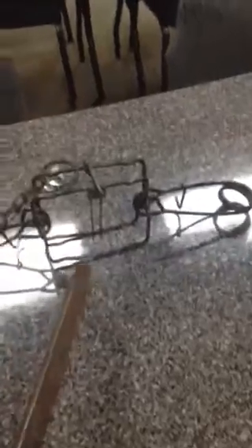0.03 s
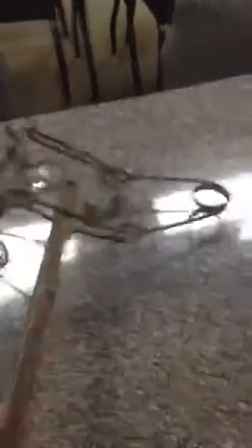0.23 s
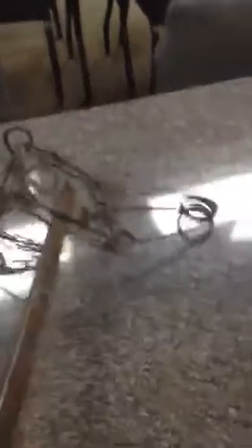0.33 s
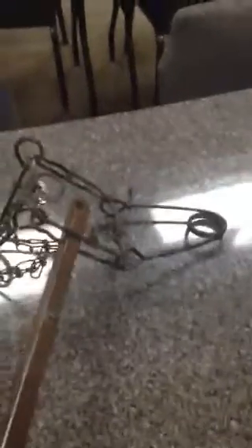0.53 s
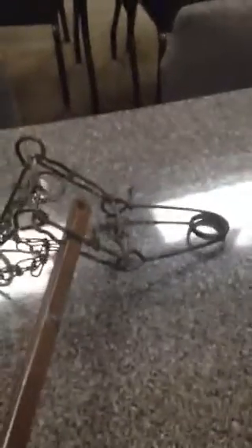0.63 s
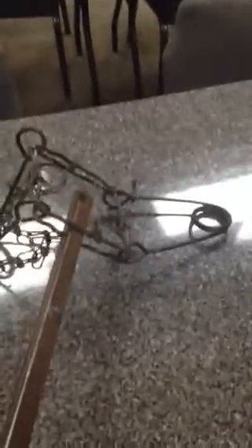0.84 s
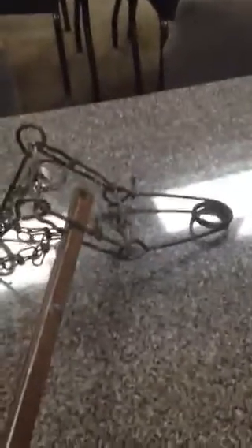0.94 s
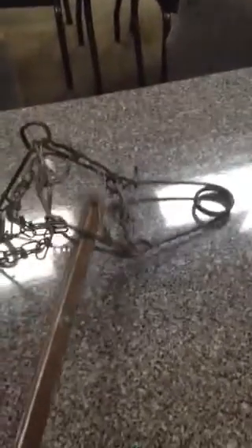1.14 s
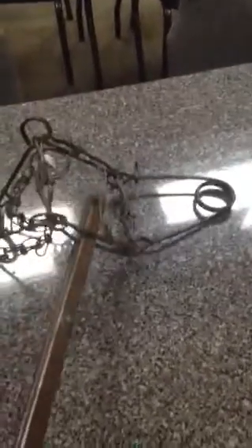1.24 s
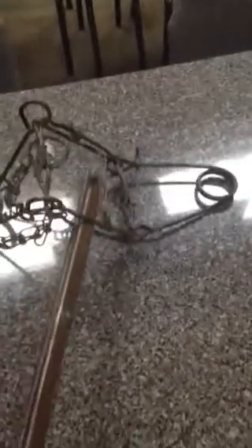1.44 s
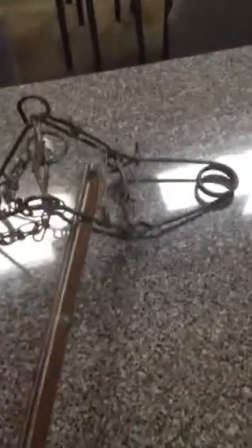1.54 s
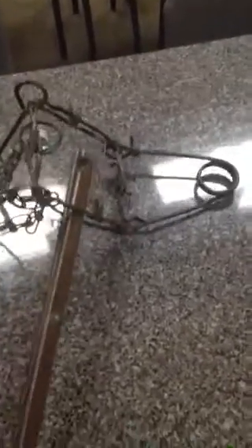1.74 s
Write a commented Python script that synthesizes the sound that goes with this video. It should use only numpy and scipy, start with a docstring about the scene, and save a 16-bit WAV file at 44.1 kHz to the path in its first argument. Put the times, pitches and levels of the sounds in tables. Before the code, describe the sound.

A wire trap slams shut sharply, followed by metal clacks, chain ticks and wooden knocks.

```python
"""A wooden stick trips a wire spring trap on a stone counter, in an echoing room with a low hush.
The trap slides softly, the trigger slips, and the jaws slam shut, chatter and leave the steel ringing.
The trap jumps, lands and settles with knocks and clacks, while links of its chain tick.
Later it slides again, the chain clicks against the frame and the stick knocks down twice.
A few faint ticks of the chain come last."""
import sys
import numpy as np
from scipy import signal
from scipy.fft import rfft, irfft
from scipy.io import wavfile

SR = 44100
rng = np.random.default_rng(int(sys.argv[2]) if len(sys.argv) > 2 else 0)


def wav_out(sig):
    """Save sig, one row per channel (or a flat mono array), as 16-bit PCM at SR to the path in sys.argv[1]."""
    wavfile.write(sys.argv[1], SR, np.round(np.clip(np.atleast_2d(sig).T, -1, 1) * 32767).astype(np.int16))


N = 79380  # 1.8 seconds

# In all tables, fade_s is the time to die away by 60 dB; a higher tilt makes a brighter sound.
# Chain links hit: start_s, level_db, tilt_db_per_octave, fade_s, ping_hz, ping_db, ping_fade_s
LINK_HITS = [(0.449, -31, -5, 0.015, 11530, -42, 0.063), (0.525, -30, 4, 0.024, 13650, -35, 0.026),
             (0.5585, -56, 9, 0.0086, 9700, -55.5, 0.27), (1.1642, -16.5, 3.5, 0.015, 8800, -29.5, 0.08),
             (1.1737, -35.5, -6.5, 0.037, 14400, -52, .03), (1.2115, -50.5, 24, .06, 9500, -59, .04),
             (1.221, -55, 14, .04, 11150, -50, 0.055), (1.2460, -63, 14, .015, 9540, -45, 0.015),
             (1.3840, -66.5, 9, 0.013, 9230, -57, 0.036), (1.426, -63, 8, .03, 10200, -66, .03),
             (1.4440, -79, 2, .02, 9700, -69, .03), (1.7660, -65, 2.5, .03, 11800, -71.5, .03)]


def from_db(db):
    """Turn decibels into a number to multiply by."""
    return 10 ** (np.asarray(db) / 20)


def at_hz(points, hz):
    """Read between the rows of a table, spacing the pitches by octaves."""
    pitches, values = np.transpose(points)
    return np.interp(np.log(np.maximum(hz, 1)), np.log(pitches), values)


def add(out, start_s, sound):
    """Mix a sound in at its start time."""
    i = int(start_s * SR)
    out[i:i + len(sound)] += sound[:len(out) - i]


def fade(fade_s, size):
    """A curve that falls by 60 dB every fade_s seconds."""
    return np.exp(-np.log(1000) * np.arange(size) / SR / max(fade_s, .002))


def gains(colour, size, tilt_db=0):
    """Turn a colour (the balance of low and high pitches) into gains that keep noise equally strong."""
    hz = np.fft.rfftfreq(size, 1 / SR)
    gain = from_db(at_hz(colour, hz) + tilt_db * np.log2(np.maximum(hz, 300)))
    return gain / np.sqrt(np.mean(gain ** 2))


def causal(gain):
    """Make a filter from these gains that lets nothing sound before the blow (minimum phase)."""
    cepstrum = irfft(np.log(gain))
    half = len(cepstrum) // 2
    cepstrum[1:half] *= 2
    cepstrum[half + 1:] = 0
    return np.exp(rfft(cepstrum))


def noise(colour, size, tilt_db=0):
    """Steady noise of a given colour, with an average strength (rms) of 1."""
    gain = gains(colour, size, tilt_db)
    return irfft(gain * np.exp(2j * np.pi * rng.random(len(gain))), size) * np.sqrt(size)


def contacts(rows, colour, size=8192, thump=0):
    """Each hit is a short burst of shaking, coloured by the thing that shakes."""
    out = np.zeros(N)
    for start_s, level_db, tilt_db, fade_s, *_ in rows:
        burst = rng.standard_normal(size) * fade(fade_s, size)
        burst[0] += thump * np.linalg.norm(burst)  # a first push, relative to the burst
        body = causal(gains(colour, size, tilt_db))
        add(out, start_s, from_db(level_db) * irfft(rfft(burst) * body))
    return out


def ringing(blows, tones):
    """Every blow rings all of an object's own tones, each with a slightly random strength."""
    out, t = np.zeros(N), np.arange(N // 2) / SR
    for pitch_hz, tone_db, fade_s in tones:
        tone = np.sin(2 * np.pi * pitch_hz * t) * fade(fade_s, len(t))
        for start_s, blow_db, *_ in blows:
            add(out, start_s, from_db(blow_db + tone_db + rng.normal()) * tone)
    return out


def hush():
    """The room's low, steady background noise."""
    # Colour of the hush: pitch_hz, level_db
    colour = [(40, -38.5), (100, -13), (170, 4.5), (290, 4), (440, -7), (680, -2.5), (1100, -11),
              (2600, -17.5), (4300, -30), (8000, -37.5), (15500, -39)]
    return from_db(-56.5) * noise(colour, N)


def slides():
    """The trap rubs on the counter in soft swells of noise."""
    # Small slides: start_s, length_s, level_db, tilt_db_per_octave
    moves = [(0.13, 0.19, -58, 5.5), (0.85, 0.1103, -54, -1), (0.858, 0.039, -52, 3.5),
             (1.1, 0.088, -48, -0.5), (1.148, 0.0209, -47.5, 5)]
    # Colour of the rubbing: pitch_hz, level_db
    colour = [(150, -27), (280, 12.5), (350, -13.5), (520, -4), (700, -19.5), (3300, -28), (5000, -44),
              (9000, -53), (15000, -68.5)]
    out = np.zeros(N)
    for start_s, length_s, level_db, tilt_db in moves:
        swell = np.hanning(int(length_s * SR))
        rubbing = noise(colour, size=16384, tilt_db=tilt_db)[:len(swell)]
        add(out, start_s, from_db(level_db) * swell * rubbing)
    return out


def trap():
    """The jaws slam, chatter and leave the steel ringing; the wire frame clacks as it settles."""
    # Trigger and jaws strike: start_s, level_db, tilt_db_per_octave, fade_s
    snaps = [(0.2112, -20.5, 1, .025), (0.2128, -14, 5, .025), (0.2213, -21, 3, .03),
             (0.2252, -14, -4.5, .025), (0.2295, 1.5, 3, .06), (0.2385, -6, -1.5, 0.13),
             (0.2465, -6, 0, .07), (0.2565, -10.5, -3.5, .04), (0.2725, -15, 2.5, 0.023)]
    # Colour of a snap: pitch_hz, level_db
    snap_colour = [(40, -7.5), (150, -5.5), (400, -8), (1400, -1), (2600, -2.5), (5000, -3.5), (7500, -1.5),
                   (10300, 3.5), (12500, -1.5), (15500, -13)]
    # The wire frame clacks: start_s, level_db, tilt_db_per_octave, fade_s
    clacks = [(0.2253, -5, 12.5, 0.05), (0.2566, -14, -1, 0.044), (0.3014, -16.5, -1.5, .015),
              (0.3544, -27.5, 5.5, 0.017), (0.4342, -17.5, -1, 0.013), (0.4465, -35, 21, .02),
              (0.4739, -32, 10, .02), (0.4881, -19.5, -5, .025), (0.5581, -22, -1.5, 0.015),
              (0.671, -49.5, -4, 0.019), (0.726, -67, -14.5, 0.026), (1.012, -44.5, 1.5, .035),
              (1.026, -59, 12, 0.018), (1.3145, -32.5, -6, .018)]
    # Colour of a clack: pitch_hz, level_db
    clack_colour = [(100, -29.5), (500, -23.5), (1200, -13), (1900, 2.5), (2500, -4), (3200, 0),
                    (4100, -0.5), (5000, -0.5), (6500, -10), (8000, -15.5), (11000, -30), (15000, -34)]
    # Short tones of the wire: pitch_hz, level_db, fade_s
    wire_tones = [(1910, -15, 0.037), (3210, -11.5, 0.027), (4090, -11.5, .025), (5010, -9.5, 0.013),
                  (6500, -20.5, 0.01)]
    # Longer tones of the frame and spring: pitch_hz, level_db, fade_s
    frame_tones = [(1403, -33, 0.54), (2285, -37.5, 0.52), (4030, -36.5, 0.24), (4992, -41.5, 0.49),
                   (6166, -38.5, .25), (6300, -37.5, .3), (8929, -46, .55), (9600, -27.5, .17),
                   (10200, -25, 0.25), (10340, -29, 0.17), (11320, -23.5, 0.13), (11320, -28.5, .14),
                   (12057, -34, .15), (13131, -33.5, .17)]
    clacking = contacts(clacks, clack_colour) + ringing(clacks, wire_tones)
    snapping = contacts(snaps, snap_colour) * chatter()
    # The loudest snap rings the frame hard; each clack rings it gently.
    slam_s = max(snaps, key=lambda row: row[1])[0]
    slam_db, gentle_db = 6.5, -23
    blows = [(slam_s, slam_db)] + [(start_s, db + gentle_db) for start_s, db, *_ in clacks]
    return snapping + clacking + ringing(blows, frame_tones)


def chatter(swings_per_s=500, swing_db=3.5):
    """Quick, uneven swings in loudness as steel bounces on steel."""
    swings = np.clip(rng.standard_normal(4096), -2, 2)
    position = np.arange(N) * swings_per_s / SR
    gain = from_db(swing_db * np.interp(position, np.arange(len(swings)), swings))
    return gain / np.sqrt(np.mean(gain ** 2))


def counter():
    """The trap knocks on the stone counter, which answers with a low boom."""
    # Knocks: start_s, level_db, tilt_db_per_octave, fade_s
    knocks = [(0.213, -26, -1, 0.15), (0.239, -19, 4.5, 0.049), (0.2528, -14.5, 8.5, 0.15),
              (0.3005, -29.5, 17, 0.12), (0.3410, -28, 8, 0.064), (0.3851, -34, 5, 0.09),
              (0.4345, -25, 2, 0.053), (0.4411, -20, 2, 0.033), (0.4467, -19, 2, 0.058),
              (0.4744, -34.5, -2, 0.064), (0.4885, -35.5, -4, 0.11), (0.586, -44.5, -1, 0.091),
              (0.669, -45.5, -1, 0.1), (1.0130, -43.5, -2, 0.052), (1.1645, -35.5, -2, 0.0458),
              (1.19, -35, 0.5, .05)]
    # Colour of a knock: pitch_hz, level_db
    colour = [(40, -13), (110, -15.5), (180, 3.5), (330, -4.5), (500, 4.5), (750, -12.5), (1050, -5),
              (1600, -5), (3000, -17), (6000, -26), (10000, -39.5), (13000, -44), (15000, -53.5)]
    # Tones of the counter: pitch_hz, level_db, fade_s
    boom_tones = [(182.7, -18, 0.23), (275, -14.5, 0.058), (475.6, -10.5, 0.067), (618, -9, .09),
                  (962.5, -8, .05), (1150, -12, 0.054)]
    return contacts(knocks, colour) + ringing(knocks, boom_tones)


def chain_ticks():
    """Small chain links strike with bright ticks."""
    # Colour of a tick: pitch_hz, level_db
    colour = [(100, -20), (1000, -32), (1800, 5), (2500, -13.5), (3200, 5), (4600, 3), (6400, -10),
              (7500, -3), (9300, -7), (12000, -15), (15000, -29)]
    return contacts(LINK_HITS, colour)


def chain_pings():
    """Each struck link rings at its own high pitch."""
    out, t = np.zeros(N), np.arange(N // 2) / SR
    for start_s, *_, ping_hz, ping_db, ping_fade_s in LINK_HITS:
        ping = np.sin(2 * np.pi * ping_hz * t) * fade(ping_fade_s, len(t))
        add(out, start_s, from_db(ping_db) * ping)
    return out


def stick():
    """The wooden stick drops on the counter and bounces: two hollow knocks."""
    # Drop and bounce: start_s, level_db, tilt_db_per_octave, fade_s
    knocks = [(1.2614, -16, 0, 0.049), (1.3150, -24, -1, 0.064)]
    # Colour of wood on stone: pitch_hz, level_db
    colour = [(40, -17), (110, -12), (180, 2), (330, -4.5), (480, 0), (620, 1), (760, -5.5), (950, 2.5),
              (1180, -1.5), (1600, -9.5), (3000, -12.5), (6000, -22.5), (10000, -34.5), (13000, -54),
              (15000, -59)]
    return contacts(knocks, colour, thump=0.574)


def room(sound):
    """The walls send back early echoes, then a smooth tail whose highest pitches die first."""
    # Colour of the early echoes: pitch_hz, level_db
    early_colour = [(60, -27), (200, 1.5), (1000, -9.5), (4000, -13), (10000, -19), (15000, -22.5)]
    # Colour of the tail: pitch_hz, level_db
    tail_colour = [(50, -36), (125, -29), (178, 4.5), (225, -7.5), (350, -7), (560, -8), (850, -11.5),
                   (1500, -10), (4000, -17.5), (8000, -19), (15000, -27.5)]
    # How long the tail lasts: pitch_hz, fade_s
    tail_fades = [(150, 1.05), (450, 0.44), (1000, 0.4), (2500, .74), (5000, 0.68), (8000, 0.56),
                  (12000, .32), (16000, 0.25)]
    hz = np.fft.rfftfreq(N, 1 / SR)
    early_noise, tail_noise = np.exp(2j * np.pi * rng.random((2, len(hz))))
    decay = fade(fade_s=0.19, size=N)
    early = irfft(early_noise, N) * np.sqrt(N) * decay / np.linalg.norm(decay)
    tail, octaves_hz = np.zeros(N), np.geomspace(125, 16000, 8)
    for centre_hz in octaves_hz:
        band = np.interp(np.log(hz + 1), np.log(octaves_hz), octaves_hz == centre_hz)
        decay = fade(at_hz(tail_fades, centre_hz), N)
        tail += irfft(tail_noise * band, N) * np.sqrt(N) * decay / np.linalg.norm(decay)
    hz = np.fft.rfftfreq(2 * N, 1 / SR)
    out = np.zeros(N)
    for echoes, colour, delay_s in ((early, early_colour, .004), (tail, tail_colour, .014)):
        spectrum = rfft(sound, 2 * N) * rfft(echoes, 2 * N) * from_db(at_hz(colour, hz))
        add(out, delay_s, irfft(spectrum)[:N])
    return out


def scene():
    """Trap, counter, stick and chain in the room, over a low hush."""
    direct = trap() + counter() + slides() + stick() + chain_ticks()
    pings = chain_pings()
    echoes = room(direct + from_db(-2) * pings)  # small links send less sound into the room
    return (direct + pings + echoes + hush())[None]


def record(dry, low_cut_hz=180, peak_limit=0.4, high_cut_hz=15300):
    """The microphone thins the bass, the loudest peaks are rounded and the highest treble is cut."""
    thin = signal.sosfilt(signal.butter(2, low_cut_hz, "high", fs=SR, output="sos"), dry)
    rounded = peak_limit * np.tanh(thin / peak_limit)
    return signal.sosfilt(signal.ellip(10, .2, 80, high_cut_hz, fs=SR, output="sos"), rounded)


dry = scene()
out = record(dry)
wav_out(out)
```